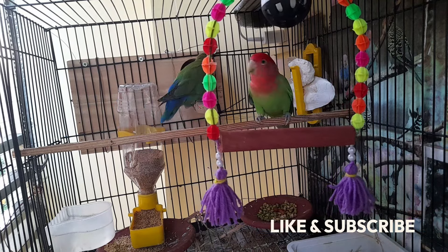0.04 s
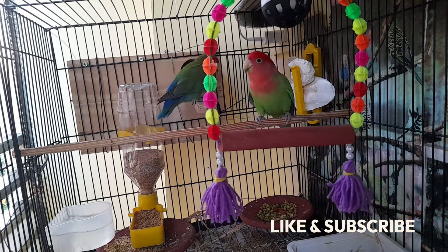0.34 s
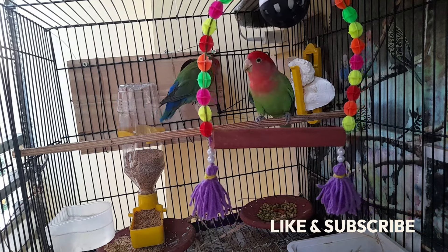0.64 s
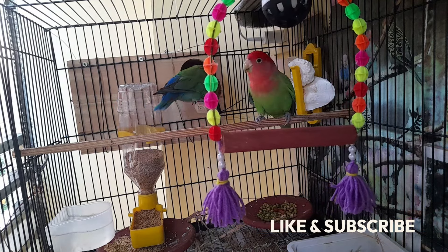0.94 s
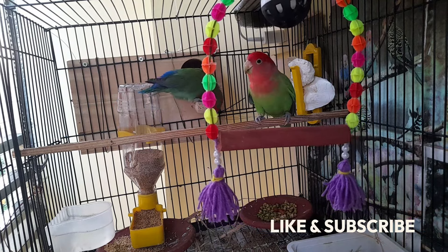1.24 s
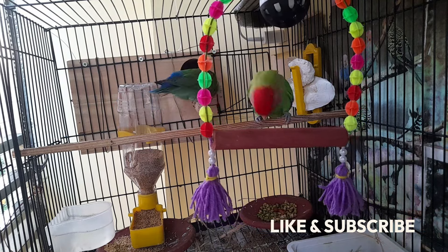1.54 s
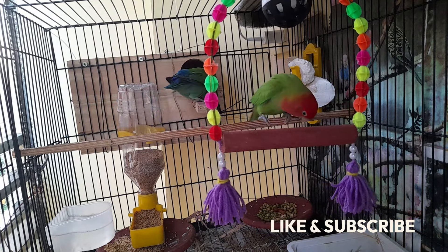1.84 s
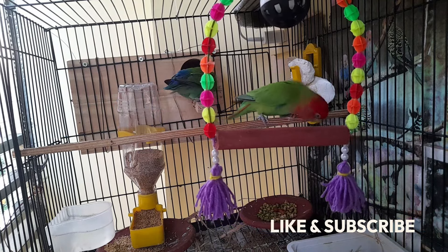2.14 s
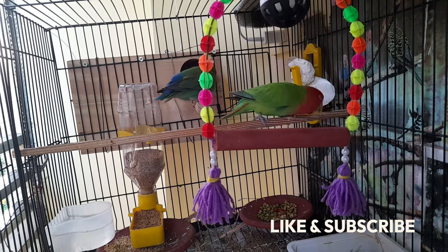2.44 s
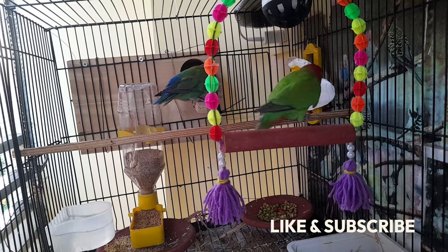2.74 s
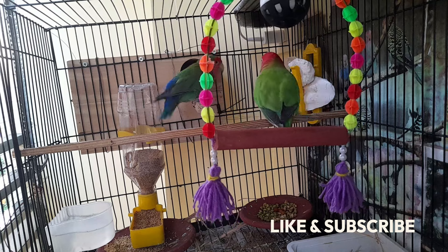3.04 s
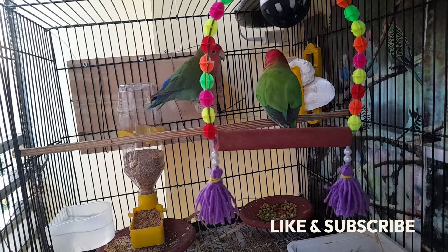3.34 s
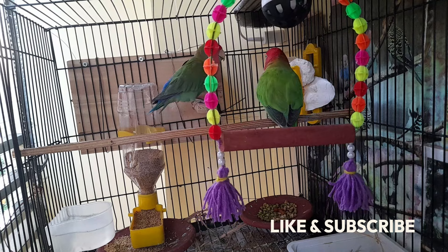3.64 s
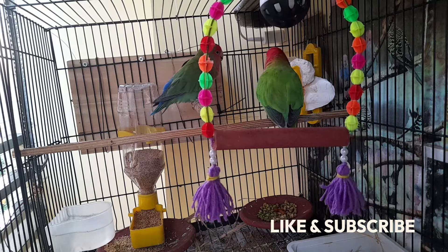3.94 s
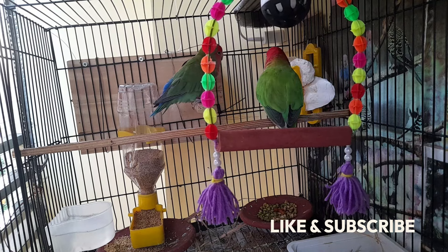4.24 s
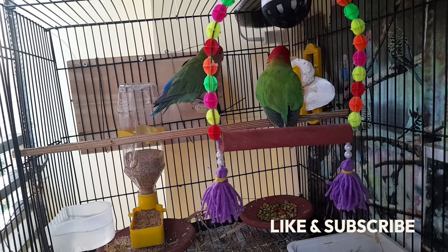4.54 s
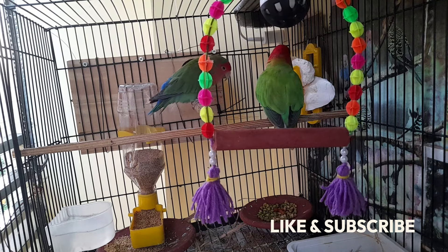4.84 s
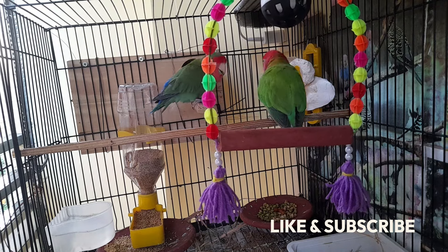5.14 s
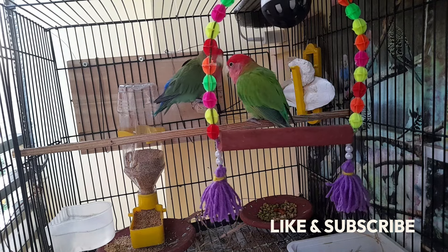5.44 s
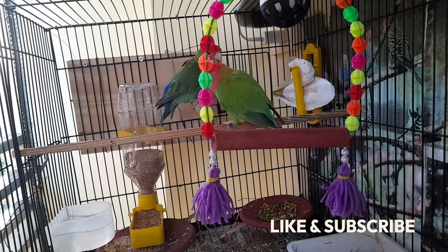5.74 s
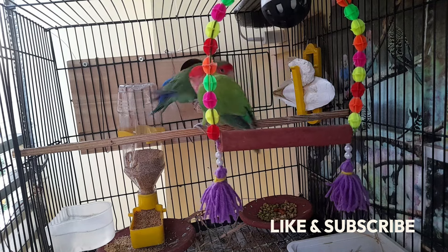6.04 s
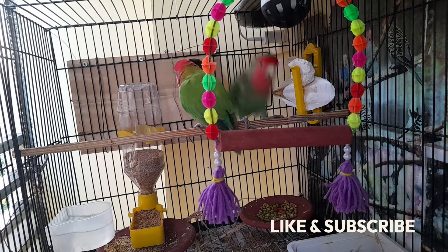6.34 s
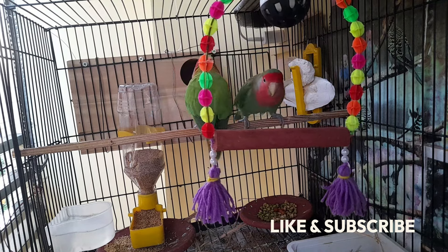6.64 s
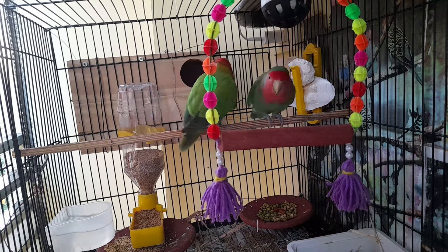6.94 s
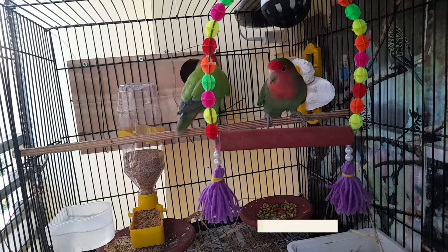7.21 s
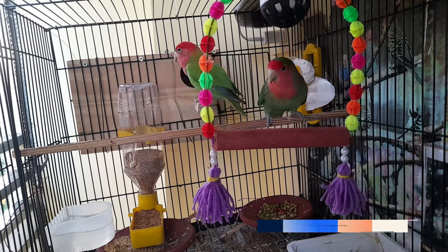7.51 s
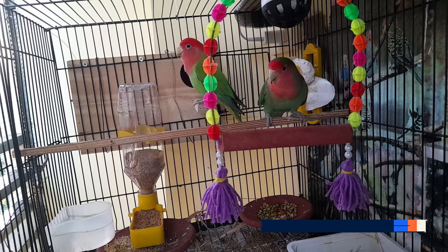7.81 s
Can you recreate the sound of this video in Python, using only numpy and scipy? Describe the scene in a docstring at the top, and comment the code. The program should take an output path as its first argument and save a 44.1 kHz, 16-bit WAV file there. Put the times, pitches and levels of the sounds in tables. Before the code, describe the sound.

Two lovebirds chirp close by in short, sharp, raspy clusters, with fainter birds answering farther off over low room noise.

```python
"""Two lovebirds chirp close by, in a wire cage in a small room.
Each chirp is one whistling membrane of the syrinx: it glides, leaps, trills and rasps, filtered by
windpipe and beak. At times the second membrane joins. Small birds answer from farther off.
Beak and claws ring the cage twice. Underneath: low room noise, faint hum, two late soft tones."""
import sys
import numpy as np
from scipy import signal
from scipy.fft import rfft, irfft
from scipy.io import wavfile
from scipy.ndimage import uniform_filter1d

SR = 44100
rng = np.random.default_rng(int(sys.argv[2]) if len(sys.argv) > 2 else 0)


def to_wav(s):
    """Save 16-bit WAV."""
    ch = np.atleast_2d(s).T  # columns
    pcm = np.round(np.clip(ch, -1, 1) * 32767)  # PCM
    wavfile.write(sys.argv[1], SR, pcm.astype(np.int16))


N = 355887

# room noise spectrum: f/Hz, relative density/dB
NOISE_SPECTRUM = [(25, -16.5), (60, -9.5), (180, -2), (240, -7), (360, -10), (880, -14), (1400, -20),
                  (2800, -28.5), (5500, -34), (8000, -41), (15500, -55)]
# hum lines: f/Hz, level/dB, left lean/0-1
HUM_LINES = [(64.6, -74.5, .6), (96.9, -72.5, .05), (912, -82, .05)]
# swell of noise and hum: t/s, gain/dB
NOISE_SWELL = [(2.9, 2.5), (3.5, -2), (4.3, -1), (4.7, 2), (8.07, 1)]
# windpipe and beak response: f/Hz, gain/dB
THROAT = [(1500, -8), (2200, -13.5), (3000, -2), (4400, -6), (6000, 0.5), (6800, -11), (7900, -15.5),
          (9300, -15), (11000, -8), (12200, -9.5), (13500, -17), (15500, -21)]
# pitch contours, one list per chirp: t/s, f/Hz
CONTOURS = [
    [(.004, 1770), (.01, 1660), (.012, 2646), (.042, 2647), (.075, 2172), (.141, 2228)],
    [(.205, 1667), (.221, 1822), (.238, 2134), (.321, 2249)],
    [(.32, 2150), (.335, 2170), (.375, 2363), (.392, 2143), (.41, 1456)],
    [(.921, 3290), (.931, 4560), (.963, 5150), (.975, 3400), (.985, 2934), (1.025, 3010)],
    [(1.022, 2870), (1.05, 2822), (1.111, 2585)],
    [(1.184, 1810), (1.192, 2190), (1.198, 3200), (1.204, 3220), (1.208, 2222), (1.238, 2240)],
    [(2.521, 2700), (2.556, 2242), (2.595, 2267), (2.624, 2480)],
    [(2.621, 3930), (2.632, 3510), (2.65, 2900), (2.685, 2990), (2.693, 3850), (2.707, 4360)],
    [(2.704, 1940), (2.738, 2147), (2.78, 2084), (2.81, 2580), (2.83, 2645), (2.87, 2993), (2.879, 2854)],
    [(3.05, 1820), (3.058, 1772), (3.062, 2310), (3.069, 1936), (3.104, 2583)],
    [(3.73, 1570), (3.738, 1630), (3.742, 2600), (3.772, 2955), (3.792, 2340), (3.849, 2452)],
    [(3.899, 1840), (3.908, 2160), (3.914, 3770), (3.918, 3810), (3.925, 2100), (3.931, 1985),
     (3.951, 2330)],
    [(4.676, 6580), (4.681, 7100), (4.692, 4250), (4.701, 6120), (4.714, 3140), (4.722, 2172),
     (4.734, 2236), (4.738, 3450), (4.75, 3420)],
    [(5.418, 1950), (5.429, 2770), (5.451, 2777), (5.455, 2125), (5.464, 2120)],
    [(5.461, 4400), (5.495, 4565), (5.528, 4290)],
    [(5.606, 2260), (5.619, 2390), (5.623, 3840), (5.645, 3950), (5.669, 3330)],
    [(5.663, 2326), (5.686, 2327), (5.697, 2870), (5.712, 2466), (5.725, 2950)],
    [(5.728, 4500), (5.74, 3880), (5.783, 3360)],
    [(5.782, 1830), (5.808, 1977), (5.816, 1710)],
    [(5.978, 2710), (5.986, 3080), (6.014, 2440)],
    [(6.011, 2584), (6.024, 3294), (6.036, 2780), (6.065, 2890), (6.15, 2657), (6.165, 2323), (6.213, 2714)],
    [(6.603, 2524), (6.614, 3250), (6.64, 3180), (6.648, 4530), (6.695, 3580)],
    [(6.696, 6530), (6.729, 6140), (6.741, 2280), (6.749, 2280), (6.753, 4280)],
    [(6.751, 4280), (6.762, 4220), (6.776, 6370), (6.8, 6380)],
    [(6.806, 1920), (6.84, 3030), (6.866, 3104), (6.873, 2393), (6.904, 2540)],
    [(7.761, 1365), (7.772, 2675), (7.8, 2864), (7.855, 2250)],
    [(7.859, 2340), (7.875, 2340), (7.882, 3780)],
    [(7.981, 3040), (8.002, 2780)],
    [(8.03, 1820), (8.072, 2160)],
]
# dynamics per contour: mid level/dB, swell/dB, arch/dB, overtones/dB, brightening/dB, L-R/dB
CHIRP_DYNAMICS = [(-33, 9.5, 0.5, -8.5, -7.5, 3), (-24, 6, 6.5, -1, -4.5, 1.5), (-25, 10, 8, -1, 9.5, 0.5),
                  (-25, -9.5, 7.5, -5.5, -8, 0), (-26.5, 6.5, 2.5, -2.5, -6.5, 2.5),
                  (-26.5, 7, 0, -8.5, 10.5, 2.5), (-28, 3.5, -3.5, -10, -0.5, 3),
                  (-25, 1, -2.5, -5.5, 0.5, 4), (-26, 9.5, 4.5, -2.5, 6.5, 1.5), (-29, 7, -7.5, 5, 18.5, 0),
                  (-29.5, 14, 0.5, -5, -5, 4), (-27, 4.5, 0.5, -6, 6.5, 3), (-25, -13.5, 8.5, -5, 7.5, 0.5),
                  (-26, 6.5, 7.5, -3.5, 3.5, 0.3), (-25.5, 0, 5.5, -10, -3, 1),
                  (-26.5, 12, 6.5, -11, 9.5, .5), (-27, 6, 3.5, -1, 17, -1), (-34.5, 4, 1.5, -11, -13, 1),
                  (-35, 2.5, 1, 0, 16, 2), (-32, 5.5, -2, 6.5, -6, 3), (-34.5, -0.5, -0.5, 1, -8, 2.5),
                  (-27.5, 0.5, -2.5, -6, 8.5, 3), (-30.5, 9, -1.5, -8.5, 4, 4),
                  (-27.5, -12, 3, -5.5, 6, 3.5), (-27, -1.5, 8, -5.5, -4, 1), (-32.5, 12, 1, -2, 0, 0.5),
                  (-27.5, -6, 1.5, -1.5, 1, 1.5), (-45, 6, -4, -21, -4, 2), (-31, 2.5, -4.5, 1, -7, 2)]
# membrane output, weaker at low pitch: f/Hz, gain/dB
REGISTER = [(1500, -2.5), (1800, -4), (2200, -0.5), (3000, 0), (4500, 1), (6500, 2)]
# leaps to a high whistle, mostly at chirp ends: t/s, length/s, top f/Hz, level/dB, L-R/dB
FLICKS = [(0.136, 0.036, 5860, -25, 2), (1.11, 0.029, 6460, -29, 4), (1.233, 0.031, 5990, -31.5, 9),
          (3.101, 0.024, 4980, -24.5, 2), (3.847, 0.026, 6370, -28, 5.5), (3.949, 0.024, 5830, -29.5, 6),
          (5.526, 0.029, 6590, -22.5, 2), (6.902, 0.0086, 6370, -26.5, 2), (6.917, 0.016, 5950, -30, 3),
          (8, 0.029, 4996, -25.5, 6)]
# irregular membrane beating: start/s, end/s, pitch scatter/oct
RASPS = [(0.211, 0.222, 0.13), (0.324, .33, 0.2), (0.961, 1.071, .045), (2.63, 2.728, 0.032),
         (2.787, 2.825, 0.045), (3.101, 3.108, 0.092), (3.893, 3.942, 0.042), (4.695, 4.739, 0.029),
         (5.445, 5.471, 0.082), (5.64, 5.744, 0.025), (5.776, 5.794, 0.12), (5.994, 6.213, 0.057),
         (6.626, 6.655, 0.072), (6.676, 6.797, 0.041), (6.892, 6.906, 0.2), (7.975, 8.004, 0.237)]
# pitch flutter: start/s, end/s, rate/Hz, depth/oct, level dip at low pitch/dB
TRILLS = [(.33, .395, 200, 0.078, 2.5), (.928, .985, 165, 0.099, 3), (2.622, 2.652, 112, 0.22, 6),
          (2.797, 2.842, 205, 0.21, 4), (3.104, 3.127, 215, 0.069, -6), (5.688, 5.725, 153, 0.023, 4.5),
          (6.014, 6.11, 170, 0.128, -1.5), (6.11, 6.215, 134, 0.021, 14), (6.622, 6.646, 266, 0.27, 2.5)]
# distant calls: t/s, length/s, first f/Hz, last f/Hz, source level/dB, hoarseness/1
FAR_CHIRPS = [(0.543, 0.066, 4120, 3044, -61.5, 0.65), (.779, 0.081, 2940, 2574, -59.5, 0.77),
              (1.49, 0.052, 5470, 5015, -56.5, .5), (1.816, 0.13, 2395, 2460, -56, 0.63),
              (1.9, 0.025, 2780, 3030, -55.5, 0.2), (2.042, .12, 2360, 2810, -57, 0.88),
              (3.113, 0.069, 4020, 3966, -47.5, 0.77), (3.15, 0.04, 5100, 4940, -50, 1.11),
              (3.588, 0.098, 4320, 5020, -58.5, 1.1), (4.031, 0.072, 3850, 3795, -57, 0.65),
              (4.151, 0.039, 3440, 3210, -54, 0.65), (4.264, 0.045, 3355, 3480, -55.5, 0.54),
              (4.393, 0.028, 3640, 3716, -49.5, 0.36), (4.415, 0.031, 5470, 4730, -55, 0.9),
              (5.079, 0.054, 5570, 5700, -69, .6), (5.801, 0.043, 4770, 4980, -52, .7),
              (6.348, 0.028, 4735, 5010, -53, 0.52), (7.328, 0.09, 3570, 3960, -66.5, 0.17),
              (7.599, 0.066, 6380, 5360, -57, 0.87), (7.666, 0.066, 3640, 4050, -59.5, 0.42)]
# second membrane's glides: t/s, length/s, first f/Hz, last f/Hz, level/dB
SECOND_GLIDES = [(1.019, 0.015, 2130, 2370, -33.5), (1.041, 0.045, 4050, 3740, -27),
                 (3.107, 0.026, 3900, 3780, -37), (6.018, 0.018, 4230, 3900, -35),
                 (6.05, .03, 3950, 4090, -34), (6.133, 0.032, 3960, 4090, -39.5)]
# blows on the cage: t/s, peak/dB
KNOCKS = [(1.615, -47.5), (4.75, -65.5)]
# cage modes: f/Hz, relative level/dB, T60/s
CAGE_MODES = [(1350, 1.5, .05), (1593, 6.5, 0.058), (4750, -3.5, 0.068)]
# faint held tones: start/s, end/s, f/Hz, peak/dB
HELD_TONES = [(6.653, 7.452, 566, -69.5), (7.095, 8.07, 289, -63)]
# echoes between cage, nest box and wall: f/Hz, T60/s
CAGE_DECAY = [(2000, 0.23), (10000, 0.12)]
# room tail: f/Hz, T60/s
ROOM_DECAY = [(1500, 0.2), (4000, 0.36), (10400, 0.057)]
# microphone balance: f/Hz, L-R/dB
MIC_BALANCE = [(700, -0.5), (2400, 0), (7000, -1.5)]


def amp(db):
    return 10 ** (np.asarray(db) / 20)


def unit_rms(x):
    return x / np.sqrt(np.mean(x ** 2) + 1e-20)


def at_hz(table, hz):
    """Table value, interpolated over log frequency."""
    f, value = np.transpose(table)
    return np.interp(np.log(hz + 1), np.log(f), value)


def add(mix, start_s, sound):
    part = mix[max(round(start_s * SR), 0):][:len(sound)]
    part += sound[:len(part)]


def wander(size, cutoff_hz):
    """Low-passed noise, rms 1."""
    f = np.fft.rfftfreq(size, 1 / SR)
    return unit_rms(irfft(rfft(rng.standard_normal(size)) / (1 + (f / cutoff_hz) ** 4), size))


def gate(t, start_s, end_s, edge_s=.002):
    return np.clip(np.minimum(t - start_s, end_s - t) / edge_s + .5, 0, 1)


def room_noise(noise_db=-63, side_db=-19, rumble_hz=130, waver_rad=0.98):
    """Low noise, near mono above the rumble, plus hum lines that drift together."""
    f, t = np.fft.rfftfreq(N, 1 / SR), np.arange(N) / SR
    spectra = rfft(rng.standard_normal((2, N))) * amp(at_hz(NOISE_SPECTRUM, f))
    spectra[1] *= amp(side_db) * (1 + 2 / (1 + (f / rumble_hz) ** 4))
    mid, side = amp(noise_db) * irfft(spectra, N) / irfft(spectra[0], N).std()
    drift = wander(N, cutoff_hz=1.7)
    for hz, db, lean in HUM_LINES:
        drift_rad = waver_rad * np.sqrt(hz / HUM_LINES[0][0]) * drift
        line = amp(db) * np.sqrt(2) * np.sin(2 * np.pi * (hz * t + rng.random()) + drift_rad)
        mid, side = mid + line, side + lean * line
    swell_db = np.interp(t, *np.transpose(NOISE_SWELL))
    return np.array([mid + side, mid - side]) * amp(swell_db)


def syrinx(hz, overtones_db, slope_db_per_oct=-9, flicker_db=1):
    """Membrane harmonics sweeping through the throat response; unit power, faded ends."""
    k = np.arange(1, 10)[:, None]
    flicker = np.array([wander(len(hz), cutoff_hz=120) for _ in k])  # unsteady pulse shape
    source_db = (k > 1) * (overtones_db + slope_db_per_oct * np.log2(k / 2)) + flicker_db * flicker
    gains = amp(source_db + at_hz(THROAT, k * hz))
    gains *= np.clip((SR / 2.5 - k * hz) / 2000, 0, 1)  # anti-alias
    wave = (gains * np.sin(2 * np.pi * k * np.cumsum(hz) / SR)).sum(0)
    fade = signal.windows.tukey(len(hz), min(1, 200 / len(hz)))
    return fade * wave / np.sqrt((gains ** 2).sum(0) / 2 + 1e-12)


def breath(size, low_hz=2200, high_hz=9000):
    """Turbulence coloured by the throat, rms 1."""
    f = np.fft.rfftfreq(size, 1 / SR)
    colour = amp(at_hz(THROAT, f)) / (1 + (low_hz / (f + 1)) ** 4) / (1 + (f / high_hz) ** 2)
    return unit_rms(irfft(rfft(rng.standard_normal(size)) * colour, size))


def envelope_db(t, arch_db, swell_db=0, attack_s=.003, release_s=.0025):
    """Tilted arch with quick edges; 0 dB at the middle."""
    u = np.linspace(-.5, .5, len(t))
    edges = np.clip((t - t[0]) / attack_s, .01, 1) * np.clip((t[-1] - t) / release_s, .01, 1)
    return swell_db * u - arch_db * (2 * u) ** 2 + 20 * np.log10(edges)


def voice(t, hz, level_db, overtones_db, jitter_oct=.012, jitter_hz=260, grain_oct=.01, shimmer_db=1):
    """Close call: trills flutter pitch and level; rasps scatter pitch and add breath."""
    size = len(t)
    rasp_oct = sum(scatter_oct * gate(t, start_s, end_s) for start_s, end_s, scatter_oct in RASPS)
    bend_oct = jitter_oct * wander(size, jitter_hz)
    bend_oct += (grain_oct + rasp_oct) * wander(size, cutoff_hz=1000)
    drive = amp(level_db + shimmer_db * wander(size, jitter_hz))
    for start_s, end_s, rate_hz, depth_oct, dip_db in TRILLS:
        if start_s < t[-1] and end_s > t[0]:
            active = gate(t, start_s, end_s)
            pace = (t > start_s) * (1 + .18 * wander(size, cutoff_hz=150))
            flutter = np.cos(2 * np.pi * rate_hz * np.cumsum(pace) / SR)
            bend_oct += active * depth_oct * flutter
            drive *= 1 + active * (unit_rms(amp(dip_db * flutter / 2)) - 1)  # air flow pulses
    tone = syrinx(hz * 2 ** bend_oct, overtones_db)
    breath_gain = amp(-40) + 2.6 * rasp_oct
    return drive * (tone + breath_gain * breath(size))


def chirp(contour, pause_s, level_db, swell_db, arch_db, overtones_db, brightening_db,
          onset_db=-9, onset_s=.0081, rest_s=.092):
    """One membrane follows a pitch contour; after a pause, air pressure must build up."""
    knots_s, knots_hz = np.transpose(contour)
    t = np.arange(knots_s[0], knots_s[-1], 1 / SR)
    hz = uniform_filter1d(np.interp(t, knots_s, knots_hz), size=110)
    build_up_db = onset_db * np.clip(pause_s / rest_s, 0, 1) * np.exp((t[0] - t) / onset_s)
    loudness_db = level_db + envelope_db(t, arch_db, swell_db) + build_up_db + at_hz(REGISTER, hz)
    ramp_db = brightening_db * np.linspace(-.5, .5, len(t))
    return t[0], voice(t, hz, loudness_db, overtones_db + ramp_db)


def flick(start_s, length_s, top_hz, level_db, leap_oct=.61, rise_s=.0024):
    """Pitch shoots up and settles on a near-pure whistle."""
    t = start_s + np.arange(0, length_s, 1 / SR)
    hz = top_hz * 2 ** (-leap_oct * np.exp((start_s - t) / rise_s))
    return start_s, voice(t, hz, level_db + envelope_db(t, arch_db=6), overtones_db=-6.5)


def near_birds():
    """All close calls, panned as the beak points; second voice centred."""
    calls, last_end_s = [], 0
    for contour, (*dynamics, pan_db) in zip(CONTOURS, CHIRP_DYNAMICS):
        pause_s = contour[0][0] - last_end_s
        calls.append((*chirp(contour, pause_s, *dynamics), pan_db))
        last_end_s = contour[-1][0]
    calls += [(*flick(*row), pan_db) for *row, pan_db in FLICKS]
    calls += [(*second_voice(*row), 0) for row in SECOND_GLIDES]
    out = np.zeros((2, N))
    for start_s, call, pan_db in calls:
        add(out[0], start_s, call * amp(pan_db / 2))
        add(out[1], start_s, call / amp(pan_db / 2))
    return out


def far_birds(scatter_hz=200, breath_db=-13):
    """Short syrinx glides, clear to hoarse; low calls carry more overtones."""
    out = np.zeros(N)
    for start_s, length_s, first_hz, last_hz, db, hoarseness in FAR_CHIRPS:
        size = int(length_s * SR)
        hz = np.geomspace(first_hz, last_hz, size) + hoarseness * scatter_hz * wander(size, 450)
        tone = syrinx(hz, overtones_db=-6 - 9 * np.log2(first_hz / 3700))
        call = tone + hoarseness * amp(breath_db) * breath(size)
        add(out, start_s, amp(db) * signal.windows.tukey(size, .5) * unit_rms(call))
    return out


def second_voice(start_s, length_s, first_hz, last_hz, level_db):
    """Glide from the other side of the syrinx."""
    t = start_s + np.arange(0, length_s, 1 / SR)
    hz = np.geomspace(first_hz, last_hz, len(t))
    return start_s, voice(t, hz, level_db + envelope_db(t, arch_db=8), overtones_db=-9.5)


def cage_knocks():
    """Light blows of beak and claws ring the cage modes."""
    out, t = np.zeros(N), np.arange(SR // 8) / SR
    ring = sum(amp(db - 60 * t / t60_s) * np.sin(2 * np.pi * hz * t) for hz, db, t60_s in CAGE_MODES)
    for start_s, peak_db in KNOCKS:
        add(out, start_s, amp(peak_db) * ring / abs(ring).max())
    return out


def held_tones(waver=.007):
    """Soft, wavering sines that fade in and out."""
    out = np.zeros(N)
    for start_s, end_s, hz, db in HELD_TONES:
        size = int((end_s - start_s) * SR)
        cycles = np.cumsum(hz * (1 + waver * wander(size, cutoff_hz=3.7))) / SR
        add(out, start_s, amp(db) * signal.windows.tukey(size, .5) * np.sin(2 * np.pi * cycles))
    return out


def reverb(x, decay, spread_hz=5000):
    """Dense reflections, T60 per band; the side signal grows with frequency."""
    hz, t, (mid, side) = signal.stft(rng.standard_normal((2, SR // 2)), SR, nperseg=256)
    hz = hz[:, None]
    side = side * 2 * hz / (hz + spread_hz)
    bands = np.array([mid + side, mid - side]) * amp(-60 * t / at_hz(decay, hz))
    tail = signal.istft(bands, SR, nperseg=256)[1]
    return signal.oaconvolve(x[None], tail / np.linalg.norm(tail[0]), axes=1)[:, :N]


def scene():
    """Close birds almost dry; far birds mostly reflected."""
    near, far, knocks = near_birds(), far_birds(), cage_knocks()
    near_mono = near.mean(0)
    close = near + amp(-13) * reverb(near_mono, CAGE_DECAY) + amp(-23) * reverb(near_mono, ROOM_DECAY)
    distant = amp(-5) * far + amp(-1) * reverb(far, ROOM_DECAY) + amp(-5) * reverb(far, CAGE_DECAY)
    cage = knocks + amp(-8) * reverb(knocks, ROOM_DECAY)
    return close + distant + cage + room_noise() + held_tones()


def record(dry, port_lag_s=8e-6, cutoff_hz=15900):
    """Two microphone ports, slightly apart in colour and arrival time; then a low-pass."""
    f = np.fft.rfftfreq(N, 1 / SR)
    lean = amp(at_hz(MIC_BALANCE, f) / 2) * np.exp(1j * np.pi * f * port_lag_s)
    coloured = irfft(rfft(dry) * np.array([lean, 1 / lean]), N)
    low_pass = signal.firwin(511, cutoff_hz, window=("kaiser", 9), fs=SR)
    return signal.oaconvolve(coloured, low_pass[None], "same")


dry = scene()
out = record(dry)
to_wav(out)
```